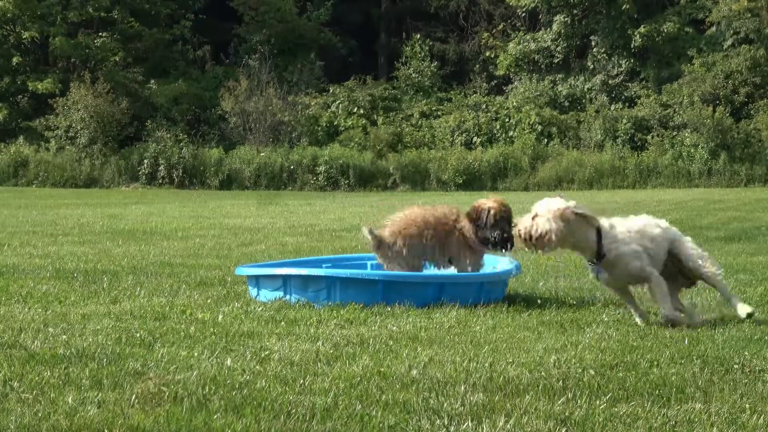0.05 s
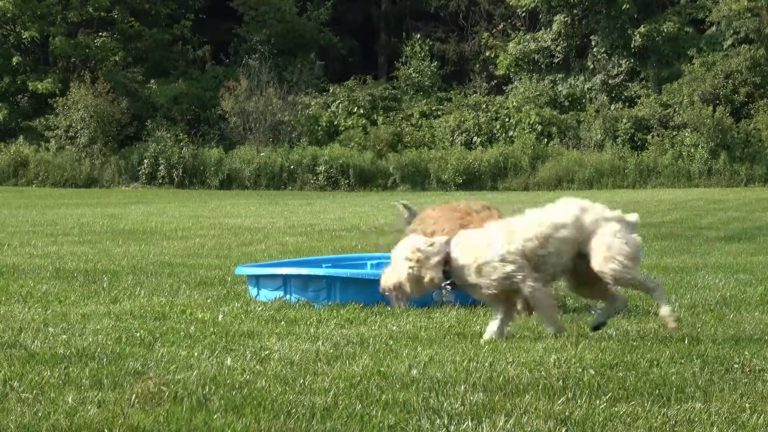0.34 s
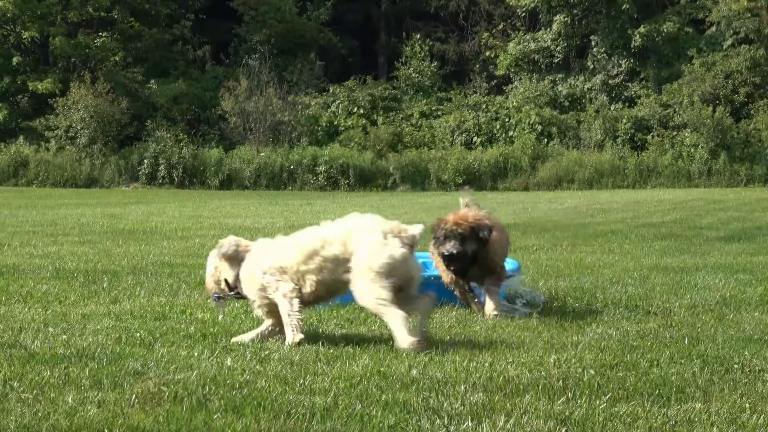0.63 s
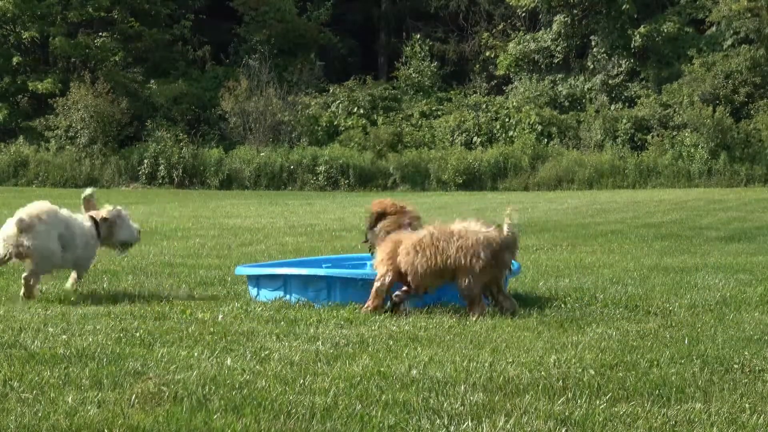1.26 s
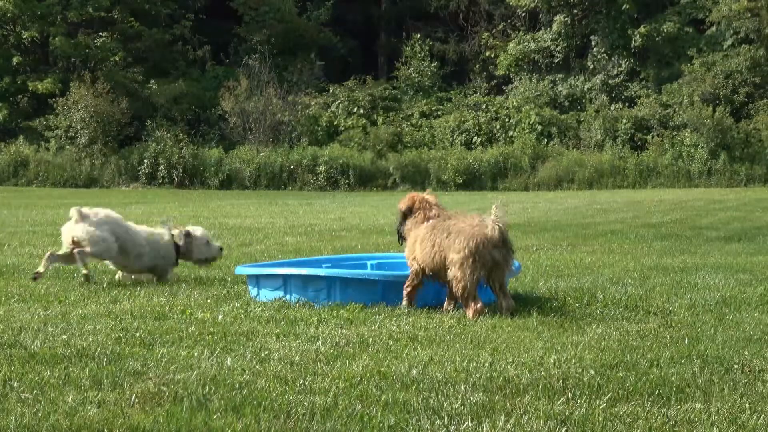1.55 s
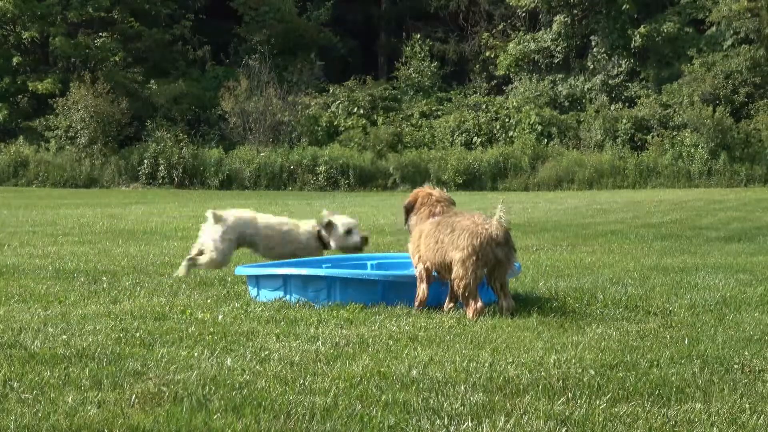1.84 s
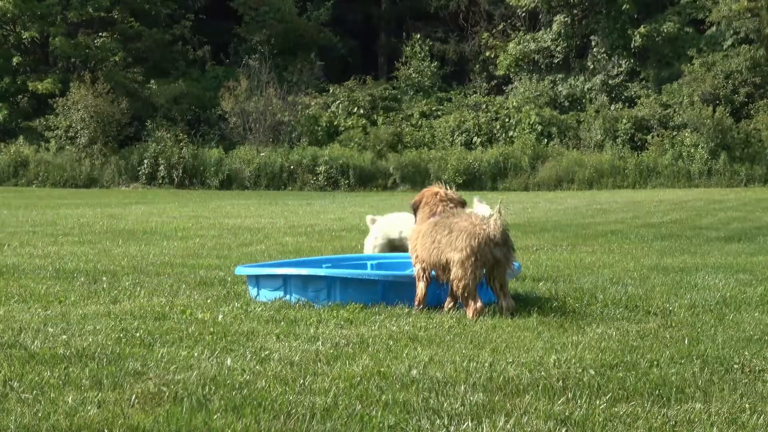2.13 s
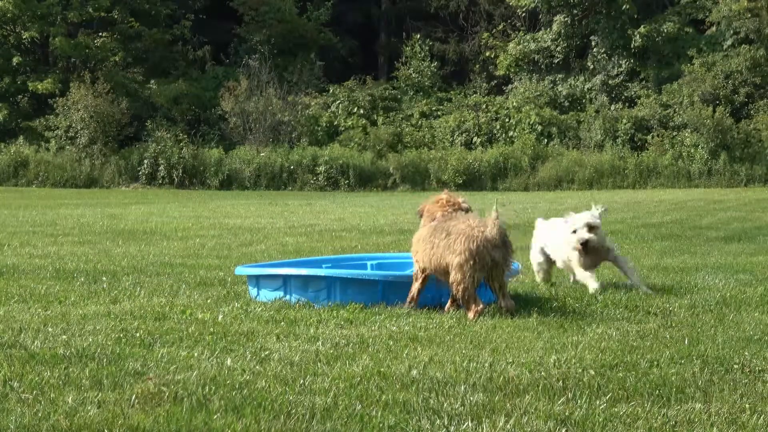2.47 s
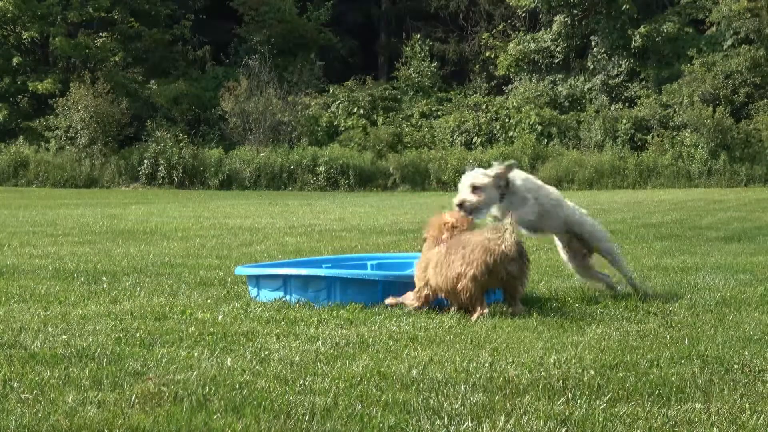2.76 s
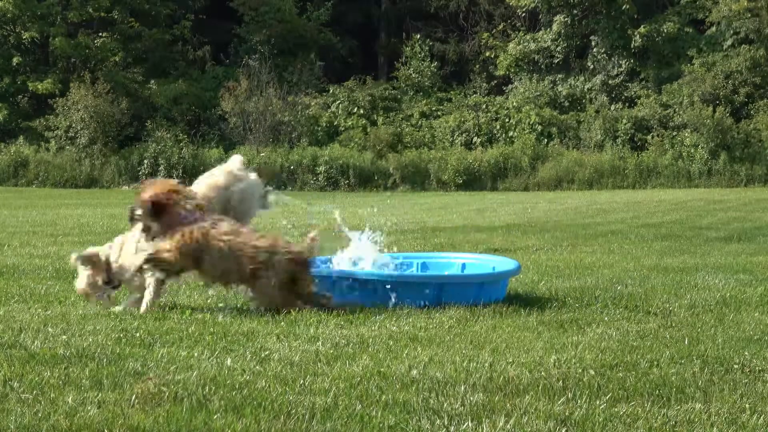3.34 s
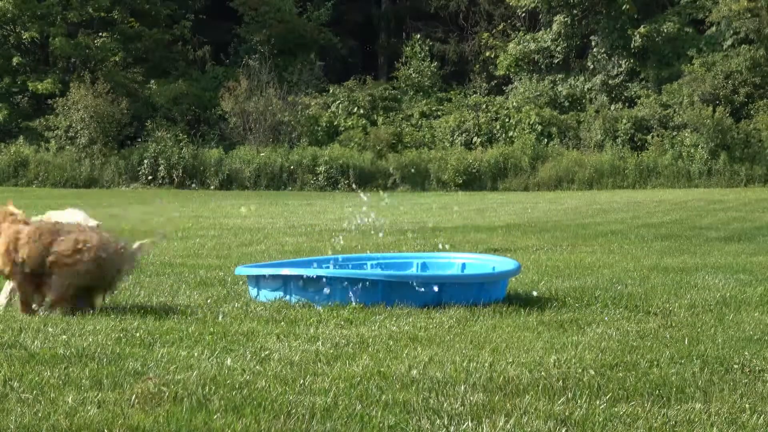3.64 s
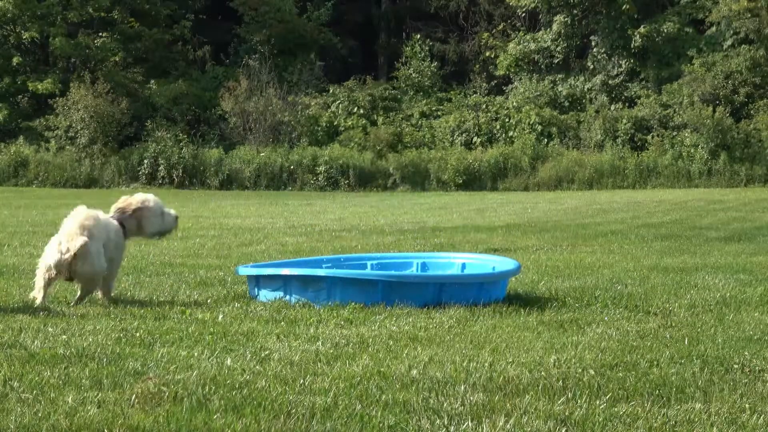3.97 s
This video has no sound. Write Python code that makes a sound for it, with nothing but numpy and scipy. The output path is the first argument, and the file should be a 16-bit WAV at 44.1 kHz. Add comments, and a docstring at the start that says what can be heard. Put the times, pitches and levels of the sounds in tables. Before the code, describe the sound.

Metal dog tags jingle and clink brightly throughout, over lightly rustling grass. In the first second, wet paws smack and slosh in a paddling pool. The jingling thins, then picks up around 2.4 seconds. At about 3.1 seconds a dog plunges through the water with a gulping splash, and drops patter back as the tags ring on. Low wind rumbles on the microphone over a quiet field.

```python
"""A lawn with a paddling pool, where two dogs romp. Their thin metal collar tags clash and ring until
they touch again, the pitch bent by the running, and jingle lightly over rustling grass. Wet paws smack
down and slosh gulping bubbles into the water; one dog plunges through and throws up spray that patters
back. Wind rumbles on the microphone over a quiet field with a far bird and a faint drone."""
import sys
import numpy as np
from scipy import signal
from scipy.fft import rfft, irfft
from scipy.io import wavfile
from scipy.ndimage import uniform_filter1d, map_coordinates

SR = 44100
rng = np.random.default_rng(int(sys.argv[2]) if len(sys.argv) > 2 else 0)


def generate_wav(sig):
    """Save sig (samples, or channels by samples) to the path in sys.argv[1] as 16-bit PCM at SR."""
    pcm = np.round(np.clip(np.atleast_2d(sig).T, -1, 1) * 32767).astype(np.int16)
    wavfile.write(sys.argv[1], SR, pcm)


N = 176400

# the modes of the two clashing tags, in five families of neighbours struck together (pitch [Hz], level [dB],
# own t60 [s])
TAG_FAMILIES = [
    [(6945, -1, .33), (7040, -9, .25)],
    [(7890, 0, .7), (7960, -15, .2), (8320, -13, .06)],
    [(10010, -1, .09), (10090, -6, .08)],
    [(11940, 0, .065), (12050, -9, .05), (11110, -21, .05)],
    [(14490, -3, .15), (14800, -5, .13), (13700, -8, .09)],
]


def undb(db):
    """Decibels to gain."""
    return 10 ** (np.asarray(db) / 20)


def unit(x):
    """Scale to rms 1."""
    return x / np.sqrt(np.mean(x ** 2) + 1e-20)


def curve(rows):
    """Join (time [s], value) points over the whole scene."""
    return np.interp(np.arange(N) / SR, *np.array(rows).T)


def colour(x, points):
    """Equalise a sound through (frequency [Hz], level [dB]) points; rms 1."""
    hz, db = np.array(points).T
    log_hz = np.log(np.arange(N // 2 + 1) * SR / N + 1e-3)
    gain = undb(np.interp(log_hz, np.log(hz), db, left=-90, right=db[-1] + 0.5))
    return unit(irfft(rfft(x) * gain, N))


def walk(rate):
    """Smooth random wander with a spread near 1."""
    k = int(SR / rate)
    steps = np.repeat(rng.standard_normal(N // k + 1), k)
    return unit(uniform_filter1d(uniform_filter1d(steps, k), k)[:N])


def add(out, start, x):
    """Mix a sound in at a start time in seconds."""
    i = max(int(start * SR), 0)
    out[i:i + len(x)] += x[:max(N - i, 0)]


def fade(t, t60):
    """Exponential decay, 60 dB down at t60."""
    return np.exp(-np.log(1000) * t / t60)


def ticks(per_s, spread_db):
    """Random tiny impacts of uneven size."""
    hits = (rng.random(N) < per_s / SR) * rng.choice([-1, 1], N)
    return hits * undb(spread_db * np.minimum(rng.exponential(size=N), 3))


def bubbles(low_hz, high_hz, cycles, glide, spread_db, count):
    """Scattered short sines: bubbles that rise as they die, or plain pings with no glide."""
    out = np.zeros(N)
    for when, pitch, size, life in rng.random((count, 4)):
        hz = low_hz * (high_hz / low_hz) ** pitch
        span = cycles * (.5 + life) / hz
        t = np.arange(int(span * SR)) / SR
        tone = np.sin(2 * np.pi * hz * t * (1 + glide * t / span))
        add(out, when * N / SR, undb(-spread_db * np.log(size + 0.059)) * fade(t, span) * tone)
    return out


def field():
    """The soft, slowly breathing hush of an open field."""
    # tone of the hush (frequency [Hz], level [dB])
    hush_eq = [(120, -14), (250, 2), (450, -9), (1000, -8.5), (2000, -16.5), (3500, -26.5), (6000, -42.5),
               (10000, -55), (16000, -58)]
    return colour(rng.standard_normal(N), hush_eq) * undb(-48.5 + walk(4.603))


def drone():
    """A far hum whose two tones waver in pitch and level."""
    # tones of the hum (pitch [Hz], level [dB])
    tones = [(176.6, -46.5), (105.16, -43.5)]
    out = np.zeros(N)
    for hz, db in tones:
        level = undb(db + 2 * walk(11.0))
        wavering_hz = hz * (1 + 0.02024 * walk(14))
        out += level * np.sin(2 * np.pi * np.cumsum(wavering_hz) / SR)
    return out


def wind():
    """Gusts buffet the microphone with a deep rumble."""
    # tone of the rumble (frequency [Hz], level [dB])
    rumble_eq = [(8, 6.5), (14, -4.5), (22, -5.5), (35, -12), (60, -18), (100, -25.5), (160, -28.5),
                 (250, -43), (500, -69)]
    # rise and fall of the wind (time [s], relative level [dB])
    gusts = [(0, -19.5), (.15, -24), (.35, -25.5), (.6, -24), (1.2, -28), (1.95, -27.5), (2.45, -26),
             (2.85, -26.5), (3.05, -28.5), (3.55, -33), (3.8, -20), (4, -30)]
    return colour(rng.standard_normal(N), rumble_eq) * undb(curve(gusts) + 1)


def bird():
    """Faint slurs from the trees, made raspy by a fast flutter in pitch."""
    # bird notes (time [s], length [s], start pitch [Hz], end pitch [Hz], level [dB])
    notes = [(2.353, .06, 5330, 4400, -63), (2.539, 0.067, 4250, 4330, -54.5)]
    out = np.zeros(N)
    for start, length, from_hz, to_hz, db in notes:
        n = int(length * SR)
        hz = np.linspace(from_hz, to_hz, n) * (1 + 0.048 * walk(1200)[:n])
        add(out, start, undb(db) * np.sqrt(2 * np.hanning(n)) * np.sin(2 * np.pi * np.cumsum(hz) / SR))
    return out


def squeak(start_s=3.02, length_s=.09, hz=1710, db=-52):
    """One thin, far squeak on a steady pitch."""
    out, n = np.zeros(N), int(length_s * SR)
    tone = np.sin(2 * np.pi * hz * np.arange(n) / SR)
    add(out, start_s, undb(db) * np.sqrt(2 * np.hanning(n)) * tone)
    return out


def drops():
    """Drops patter back on the pool as ticks and small plinking bubbles."""
    # swell of the patter (time [s], level [dB])
    patter = [(0, -44), (.25, -49), (.45, -51), (.9, -55), (1.1, -71), (3.0, -61.5), (3.15, -42.5),
              (3.4, -42), (3.55, -47.5), (3.8, -46.5), (4, -54)]
    # tone of the patter (frequency [Hz], level [dB])
    patter_eq = [(250, -24), (500, -0.5), (1000, -2.5), (1800, 6.5), (3000, 6.5), (6000, 1), (12000, -44)]
    plinks = unit(bubbles(394, 6120, cycles=44, glide=0.14, spread_db=2.5, count=1800))
    impacts = undb(2) * unit(ticks(900, spread_db=4))
    return undb(curve(patter)) * colour(plinks + impacts, patter_eq)


def sloshes(attack_s=0.0032, release_s=0.0079, hollow_width_hz=360):
    """Paws push gulping bubbles under, another size each time, and splatter small ones with spray."""
    # paw strokes (time [s], length [s], gulp pitch [Hz], gulp level [dB], splatter level [dB])
    strokes = [(0.016, 0.033, 575, -39.5, -41), (0.076, 0.049, 530, -37, -58),
               (0.191, 0.024, 1000, -42.5, -50), (0.227, 0.019, 1200, -51, -39.5),
               (0.679, 0.013, 570, -33.5, -43), (.835, 0.022, 550, -43, -60), (3.169, 0.029, 410, -33, -41),
               (3.204, 0.017, 470, -22, -50), (3.238, 0.024, 594, -37.5, -40),
               (3.258, 0.037, 438, -28, -33), (3.311, 0.05, 352, -28, -32.5), (3.367, 0.056, 473, -38, -39),
               (3.556, 0.036, 706, -45, -52), (3.725, 0.063, 445, -42.5, -57)]
    # tone of the splatter (frequency [Hz], level [dB])
    splatter_eq = [(600, -9), (1000, -3.5), (1800, 2), (2800, 3), (4000, -2.5), (8000, -4), (15000, -6)]
    t = np.arange(N) / SR
    gulps, splatter_level = np.zeros(N), np.zeros(N)
    big = bubbles(199.5, 1312, cycles=23.6, glide=0.15, spread_db=0.6, count=2200)
    for start, length, hz, gulp_db, splatter_db in strokes:
        attack = np.clip((t - start) / attack_s, 0, 1)
        shape = attack * np.exp(-np.maximum(t - start - length, 0) / release_s)
        hollow = signal.iirpeak(hz, hz / hollow_width_hz, fs=SR)
        cluster = signal.lfilter(*hollow, signal.lfilter(*hollow, big))
        gulps += undb(gulp_db) * shape * cluster / np.sqrt(np.average(cluster ** 2, weights=shape ** 2))
        splatter_level += undb(splatter_db) * shape
    fizz = undb(-4.5) * unit(bubbles(3250, 17200, cycles=42, glide=.04, spread_db=5.5, count=6000))
    small = unit(bubbles(890, 4510, cycles=40, glide=0.086, spread_db=4, count=4000))
    spit = undb(-1) * unit(ticks(2500, spread_db=-4))
    return gulps + splatter_level * colour(small + fizz + spit, splatter_eq)


def plunge(start_s=3.165, length_s=0.076, db=-34.5):
    """A dog hits the pool: a sheet of water slaps down and bubbles of nearly one size ring together."""
    out, n = np.zeros(N), int(length_s * SR)
    cluster = unit(bubbles(2460, 3360, cycles=61, glide=.06, spread_db=3, count=2400))[:n]
    add(out, start_s, undb(db) * np.sqrt(np.hanning(n)) * cluster)
    return out


def paws(thud_hz=213, smack_top_hz=3900):
    """A wet paw lands flat: a sharp smack and a short low thud."""
    # paw landings (time [s], thud level [dB], smack level [dB])
    landings = [(.244, -49, -32.5), (.681, -27, -34), (3.122, -57, -28.5)]
    out, t = np.zeros(N), np.arange(SR // 8) / SR
    for start, thud_db, smack_db in landings:
        noise = unit(signal.lfilter(*signal.butter(2, smack_top_hz, fs=SR), rng.standard_normal(len(t))))
        smack = undb(smack_db) * fade(t, t60=0.044) * noise
        thud = undb(thud_db) * fade(t, t60=0.083) * np.sin(2 * np.pi * thud_hz * t)
        add(out, start, thud + smack)
    return out


def rattle(touches_per_s=130, detune=.008):
    """The tags brush lightly, each touch waking one mode a little off pitch, and the grass rustles."""
    # swell of the jingle and rustle (time [s], relative level [dB])
    movement = [(0, -41), (.27, -45.5), (.34, -51), (.47, -45.5), (.65, -52.5), (.86, -47.5), (1.04, -60),
                (1.2, -47), (1.3, -58.5), (1.36, -54), (1.44, -52.5), (1.72, -55), (1.97, -62), (2.33, -69),
                (2.55, -57.5), (2.83, -44.5), (3.0, -53), (3.34, -41.5), (3.6, -49.5), (4, -56.5)]
    # tone of the rustle (frequency [Hz], level [dB])
    rustle_eq = [(2000, -2.5), (4000, -5.5), (6000, -7), (8300, 5.5), (10500, -6), (13000, 1.5),
                 (16000, -45)]
    touches, t = np.zeros(N), np.arange(SR // 8) / SR
    modes = sum(TAG_FAMILIES, [])
    for when, which, bend, size in rng.random((int(touches_per_s * N / SR), 4)):
        hz, db, t60 = modes[int(which * len(modes))]
        tone = np.sin(2 * np.pi * hz * (1 + detune * (2 * bend - 1)) * t)
        ring = fade(t, t60) * fade(t, t60=.09) * tone
        add(touches, when * N / SR, size * undb(db / 2) * ring / hz)  # high modes wake less
    crackle = unit(ticks(2700, spread_db=4.5))
    glints = unit(bubbles(3980, 16200, cycles=22, glide=0, spread_db=7, count=6000))
    rustle = colour(crackle + glints, rustle_eq) * undb(2 * walk(40.5))
    jingle = unit(touches * undb(2 * walk(24.92)))
    return undb(curve(movement)) * (undb(-3.5) * jingle + undb(-2.5) * rustle)


def tags():
    """Each clash ticks, chatters and rings the swinging tags' modes; the next contact chokes the ring."""
    # tag clashes (time [s], extra damping t60 [s], contact level [dB], five family levels [dB])
    clashes = [(0.053, 0.44, -46, -43, -41, -59, -30, -47), (0.167, 1.5, -48, -42, -38, -41, -53, -41),
               (0.198, 0.053, -46, -45, -30, -50, -34, -32), (0.245, 0.072, -30, -34, -39, -45, -32, -25),
               (0.252, 0.044, -27.5, -34, -32, -38, -37, -36), (0.262, 0.23, -37, -51, -52, -42, -31, -42),
               (0.3845, 0.19, -43, -60, -40, -61, -39, -51), (0.424, 1.5, -40, -55, -38, -59, -49, -45),
               (0.457, 2.3, -42, -40, -43, -40, -45, -36), (0.534, 0.06, -32, -46, -41, -29, -40, -43),
               (0.541, 0.91, -32.5, -28.5, -33.5, -47, -19, -31),
               (0.576, 0.04, -27, -26, -45, -51, -48, -46), (0.709, 1.6, -41, -37, -35.5, -56, -32.5, -39),
               (0.779, 1.5, -37, -55, -40, -46, -40, -39), (0.795, 0.08, -31.5, -45, -34, -27, -33, -36),
               (0.807, 1.5, -37.5, -41, -38, -31, -40, -44), (0.819, 0.15, -54, -44, -41, -26, -49, -46),
               (0.848, 0.021, -37, -48, -51, -18.5, -43, -46),
               (0.86, 0.019, -42, -48, -44, -19.5, -44, -46),
               (0.876, 0.031, -31.5, -38, -50, -34, -42, -40), (0.966, 0.098, -48, -51, -58, -62, -49, -59),
               (1.217, 1.5, -47, -54, -63, -49, -43, -52), (1.493, 4, -42, -42, -28.5, -55, -40, -36),
               (1.592, 0.16, -43, -65, -65, -35, -60, -52), (1.703, 0.25, -45.5, -47, -49, -54, -36.5, -47),
               (1.744, 0.036, -54, -54, -56, -44, -34, -61), (1.765, 0.1, -42, -62, -39, -56, -27, -52),
               (1.885, 0.11, -41.5, -47, -38, -57, -46, -53),
               (2.179, 0.038, -37.5, -56, -44, -38, -37, -46), (2.401, 1.5, -54, -51, -54, -35, -29, -48),
               (2.411, 1.5, -30.5, -40, -32, -24, -25, -38), (2.417, 2, -55, -35.5, -24, -34, -24, -31),
               (2.475, 0.22, -43, -42, -31.5, -53, -21, -47), (2.512, 1.5, -38.5, -57, -47, -51, -31, -55),
               (2.528, 0.043, -34, -40, -35, -40, -29, -44), (2.623, 0.17, -48, -62, -61, -34.5, -38, -57),
               (2.767, 0.084, -31.5, -40, -46, -35, -30, -25), (2.8, 0.025, -23.5, -32, -31, -44, -33, -39),
               (2.809, 0.06, -27.5, -28, -32, -43, -22.5, -27), (2.888, 0.06, -47, -60, -41, -42, -31, -48),
               (2.952, 0.032, -42, -41, -44, -48, -29, -40), (3.212, 1.5, -40, -48, -50, -56, -31, -49),
               (3.261, 0.036, -40, -45, -44, -43, -21, -44), (3.281, .04, -31, -45, -44, -40, -28, -43),
               (3.345, 1.5, -47, -51, -36, -57, -23.5, -30), (3.358, 0.15, -49, -53, -36, -54, -29, -37),
               (3.4556, 0.14, -26, -34, -26.5, -54, -11, -35),
               (3.531, 0.12, -30.5, -40, -36, -28.5, -36, -34),
               (3.551, 0.4, -49, -59, -28.5, -52, -53, -49), (3.582, 0.044, -45, -53, -48, -29.5, -29, -48),
               (3.65, 0.62, -51, -44, -36.5, -59, -35, -45),
               (3.809, 0.25, -39.5, -40.5, -46, -42, -46, -46),
               (3.981, 0.018, -45, -45, -37, -64, -42, -50)]
    # clashes that also set a second, lower tag pinging (time [s], level [dB])
    pings = [(0.478, -46), (0.575, -42), (.807, -46), (2.417, -40), (3.531, -44)]
    # the collar's run towards the microphone (time [s], speed [m/s])
    approach = [(0, 2), (.42, 3), (.55, 2), (.72, -0.5), (1.5, -2), (1.77, -3.5), (2.15, -2), (2.42, 2.5),
                (2.85, 2), (3.3, 0), (3.46, -1), (3.55, -1), (3.8, -5.5)]
    # tone of metal touching metal (frequency [Hz], level [dB])
    contact_eq = [(1500, -39), (2600, -11), (4500, -6.5), (6500, -0.5), (8600, 2.5), (10500, -8),
                  (13000, -3), (16000, -22)]
    rise_s, choke_t60_s, tick_s, chatter_s = 0.00032, 0.017, 0.00093, 0.0075
    detune, spread_db, ping_hz = 0.0018, 3.5, 6090
    swing_m, swing_db, sound_m_s = 0.0088, 2, 343
    ring, contact = np.zeros(N), np.zeros(N)
    t = np.arange(SR // 2) / SR
    tick_and_chatter = undb(3.5) * np.exp(-t / tick_s) + undb(-7) * np.exp(-t / chatter_s)
    ends = [row[0] for row in clashes[1:]] + [N / SR]
    for (start, damping_t60, contact_db, *family_dbs), end in zip(clashes, ends):
        doppler = 1 + np.interp(start, *np.array(approach).T) / sound_m_s
        choke = fade(np.maximum(t - (end - start), 0), choke_t60_s)
        shape = (1 - np.exp(-t / rise_s)) * fade(t, damping_t60) * choke
        for family, family_db in zip(TAG_FAMILIES, family_dbs):
            for hz, db, t60 in family:
                bent_hz = hz * doppler * (1 + detune * rng.standard_normal())
                size = undb(0.5 + db + family_db + spread_db * (2 * rng.random() - 1))
                tone = np.sin(2 * np.pi * (bent_hz * t + rng.random()))
                add(ring, start, size * shape * fade(t, t60) * tone)
        add(contact, start, undb(contact_db) * tick_and_chatter)
    for start, db in pings:
        add(ring, start, undb(db) * fade(t, t60=.17) * np.sin(2 * np.pi * ping_hz * t))
    # the tags dangle to and fro, so the ring wavers in pitch and level
    swing_samples = swing_m * walk(90) / sound_m_s * SR
    swung = map_coordinates(ring, [np.arange(N) + swing_samples], mode="nearest")
    swung *= undb(swing_db * walk(70))
    return swung + contact * colour(ticks(9000, spread_db=4), contact_eq)


def lawn_scatter(x, db=-16, t60_s=0.16):
    """The lawn and the pool scatter a sound back, adding a short, faint tail."""
    t = np.arange(SR // 2) / SR
    tail = rng.standard_normal(len(t)) * fade(t, t60_s)
    return x + undb(db) * signal.fftconvolve(x, tail / np.linalg.norm(tail))[:N]


def scene():
    """Collars, water and the outdoor bed, mixed in mono."""
    collars = lawn_scatter(tags()) + rattle()
    water = sloshes() + drops() + paws() + plunge()
    outdoors = bird() + squeak() + wind() + field() + drone()
    return (collars + water + outdoors)[None]


def record(dry):
    """A steep low-pass cuts the very top of the treble."""
    top_hz = 15700
    return signal.sosfilt(signal.ellip(8, .2, 70, top_hz, fs=SR, output="sos"), dry)


dry = scene()
out = record(dry)
generate_wav(out)
```